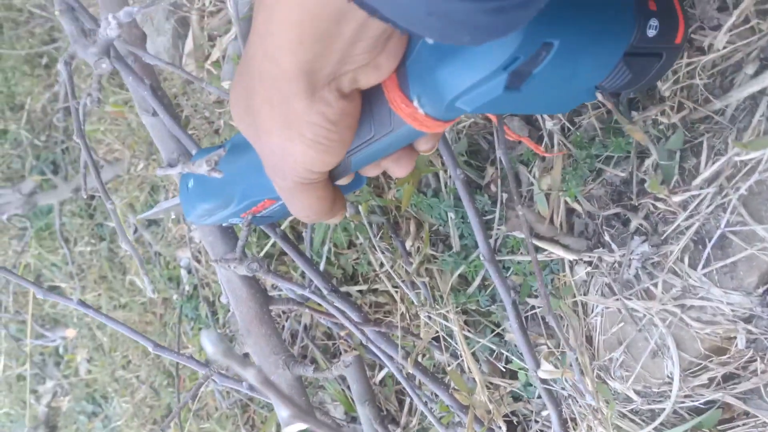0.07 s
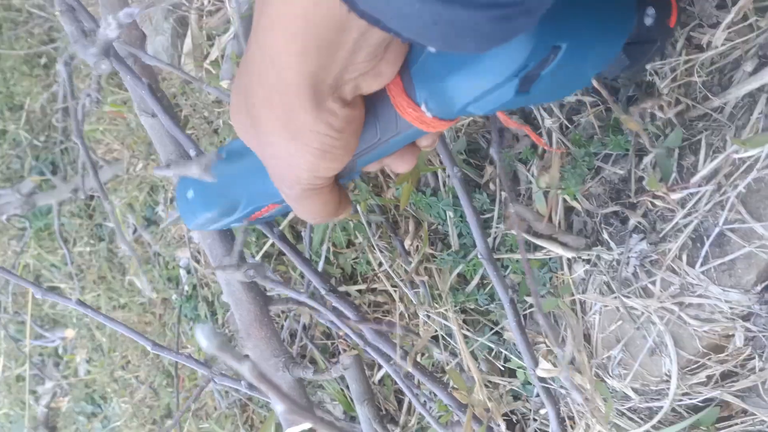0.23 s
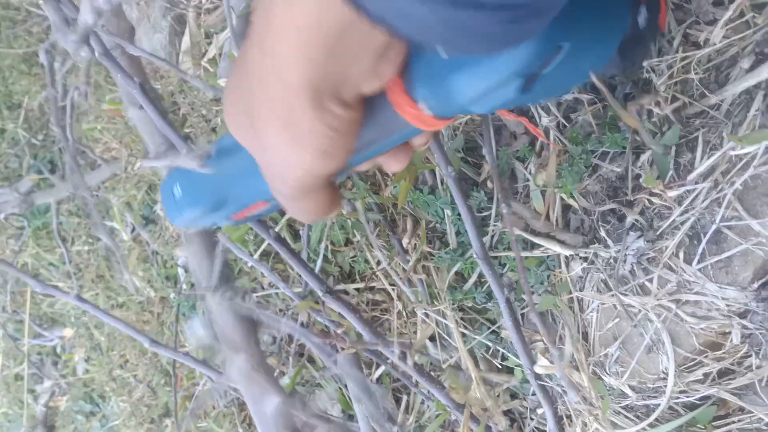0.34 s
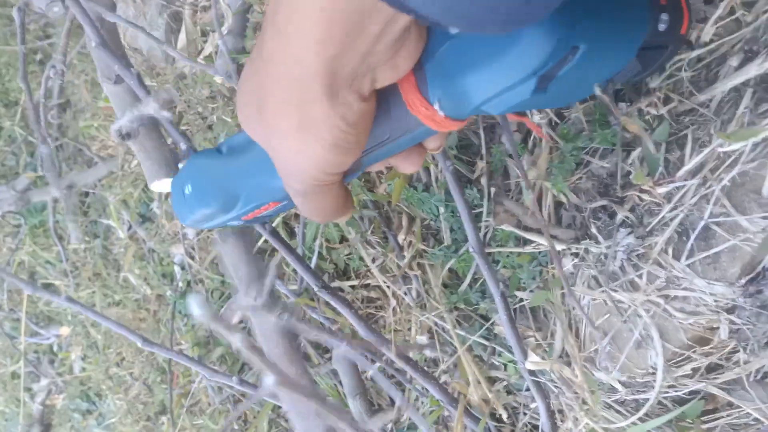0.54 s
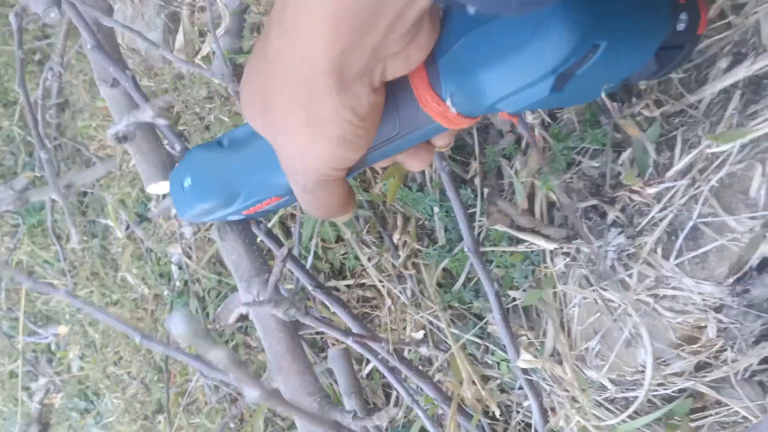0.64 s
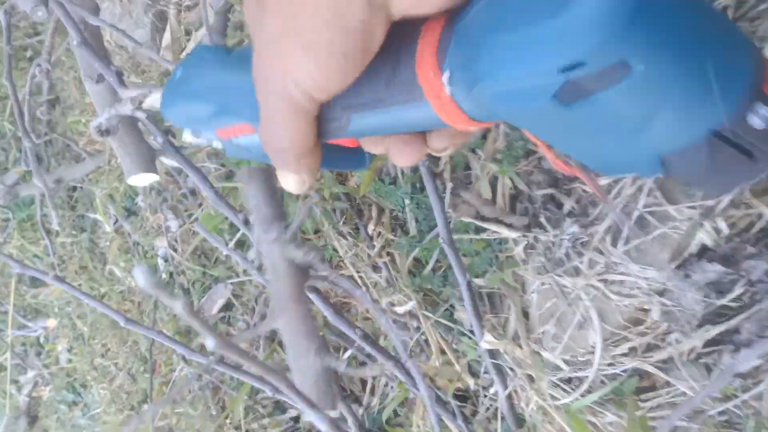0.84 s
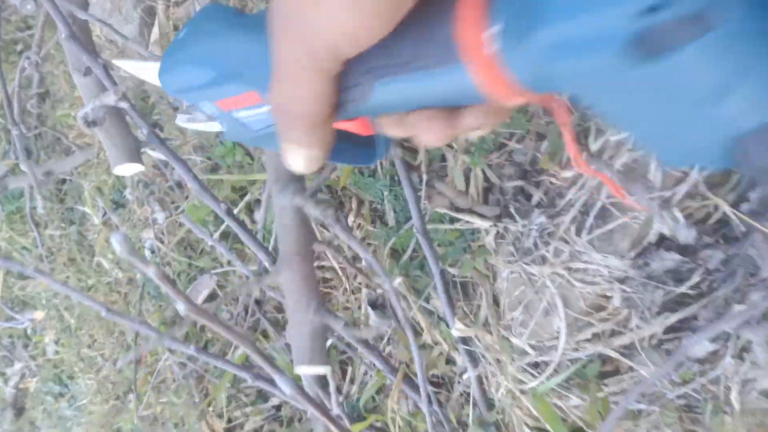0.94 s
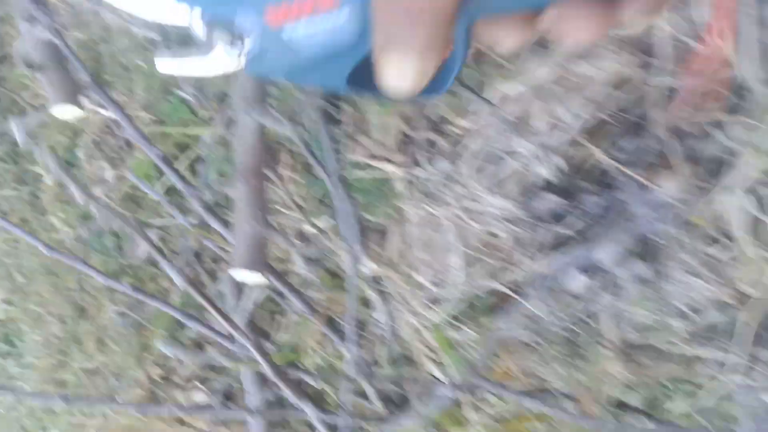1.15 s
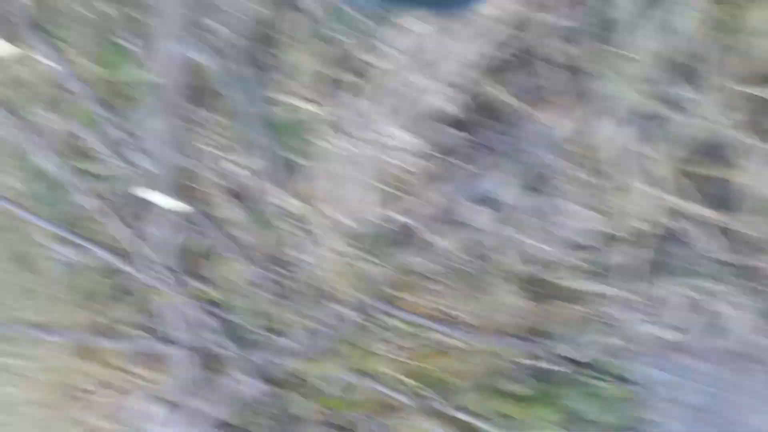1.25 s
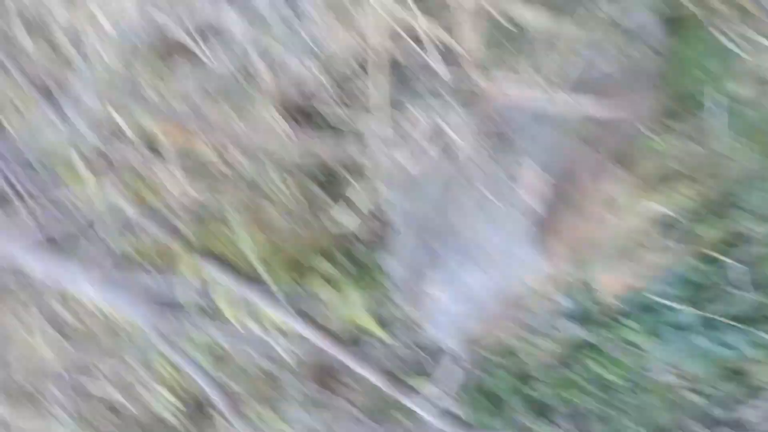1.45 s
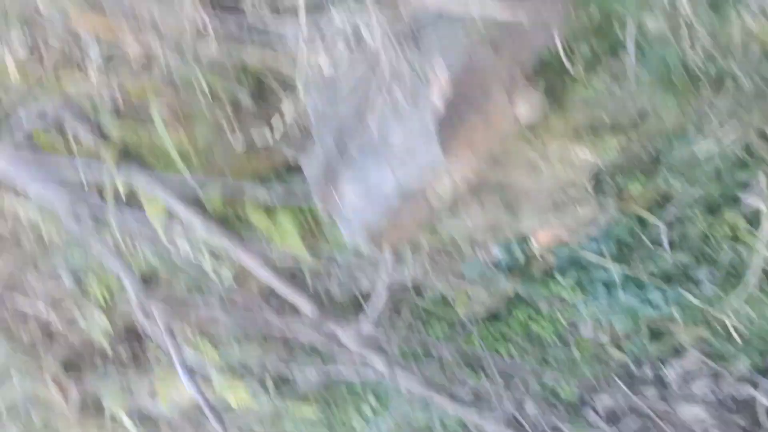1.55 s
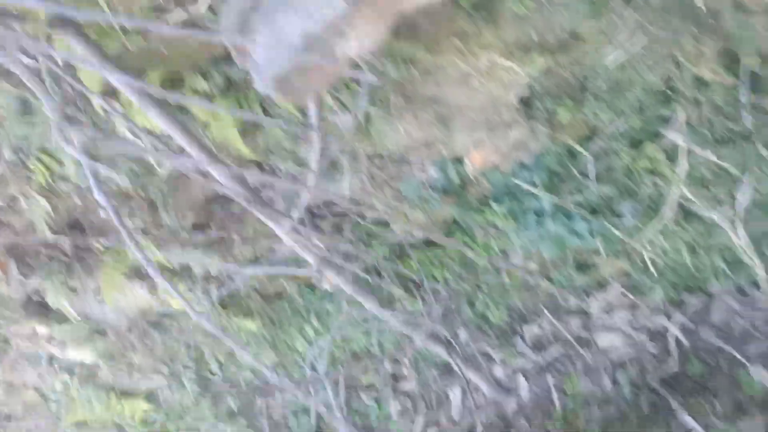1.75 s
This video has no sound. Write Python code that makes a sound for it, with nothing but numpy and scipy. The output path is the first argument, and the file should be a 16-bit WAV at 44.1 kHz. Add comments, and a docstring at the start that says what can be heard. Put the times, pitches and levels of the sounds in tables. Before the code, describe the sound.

A cordless pruner whines, snaps through a branch, then whirs open, and twigs rustle.

```python
"""A geared motor whines up to speed close to the microphone: a cordless pruner, outdoors.
The whine sags as the blade bites, and the branch snaps. The stalled motor hums while it holds the
blade shut, then whirs again to open it with a hollow knock. A sleeve and dry twigs rustle and scrape
as the tool is drawn away; light wind touches the microphone."""
import sys
import numpy as np
from scipy import signal
from scipy.fft import rfft, irfft
from scipy.io import wavfile
from scipy.ndimage import uniform_filter1d

SR = 44100
rng = np.random.default_rng(int(sys.argv[2]) if len(sys.argv) > 2 else 0)


def wrap_up_sound(samples):
    """Save the sound to the file named by the first command line argument, as 16-bit audio."""
    columns = np.atleast_2d(samples).T
    # keep every value between -1 and 1, then stretch to whole-number steps
    tamed = np.clip(columns, -1, 1)
    steps = np.round(tamed * 32767).astype(np.int16)
    wavfile.write(sys.argv[1], SR, steps)


N = 79380
T = np.arange(N) / SR
HZ = np.fft.rfftfreq(N, 1 / SR)

# The two strokes. Each row: time in seconds, gear mesh rate in Hz, whine level in dB.
CLOSE_STROKE = [(0.185, 2020, -86), (0.205, 2629, -71), (0.214, 2890, -58), (0.226, 3120, -35),
                (0.25, 2947, -41), (0.28, 2660, -39.5), (0.3, 2500, -47), (0.33, 2400, -48),
                (0.365, 2290, -44.5), (0.4, 2430, -44.5), (0.417, 2469, -45.5), (0.432, 2756, -62),
                (0.452, 2550, -64), (0.461, 1730, -58), (0.48, 890, -107)]
OPEN_STROKE = [(0.618, 555.5, -73), (0.635, 1443, -58), (0.655, 2700, -57.5), (0.668, 2971, -57),
               (0.685, 3150, -57), (0.71, 3260, -59), (0.79, 3262, -53.5), (0.803, 3070, -56),
               (0.81, 2768, -56), (0.822, 2437, -50), (0.83, 2124, -58), (0.839, 1866, -43.5),
               (0.85, 1683, -65), (0.89, 890, -66.5)]
# Gear partials, loaded and running free. Each row: multiple of the mesh rate, gain in dB.
CLOSE_PARTIALS = [(0.63, -19), (0.917, -10), (1, 0.5), (1.042, -1.5), (1.25, -19)]
OPEN_PARTIALS = [(1, -0.5), (1.665, -17), (2, -22)]
# Partials that swell as the load shifts.
# Each row: multiple of the mesh rate, peak time and half length in seconds, level in dB.
SQUEALS = [(1.625, 0.3, 0.031, -46.5), (2.27, 0.294, 0.019, -63), (1.875, 0.35, 0.019, -57),
           (1.875, 0.423, 0.019, -56)]
# Gear rattle. Each row: time in seconds, level in dB.
CLOSE_RATTLE = [(0.16, -82), (0.175, -70.5), (0.195, -55), (0.213, -54.5), (0.23, -45), (0.255, -44),
                (0.3, -41), (0.36, -42.5), (0.415, -40), (0.43, -52), (0.455, -50), (0.475, -74),
                (0.485, -54.5), (0.53, -80)]
OPEN_RATTLE = [(0.61, -70), (0.638, -52.5), (0.657, -51), (0.675, -59), (0.75, -57.5), (0.8, -57.5),
               (0.85, -63.5), (0.89, -61.5)]
# Spectra of that rattle. Each row: frequency in Hz, relative level in dB.
CLOSE_SPECTRUM = [(100, -22), (300, -19), (600, -9), (1100, -5.5), (1800, 0.5), (2700, 3), (3400, 0),
                  (4300, -7.5), (5300, -13), (7000, -18.5), (10000, -25.5), (15000, -26)]
OPEN_SPECTRUM = [(100, -13), (500, -2), (1100, -1.5), (1800, 0.5), (2700, -5.5), (4200, -7.5), (5500, -14),
                 (8000, -25.5), (15000, -53)]
# Gear case resonance. Each row: time in seconds, frequency in Hz, level in dB.
CASE_BUZZ = [(0.65, 1526, -66), (0.7, 1668, -57), (0.75, 1782, -52.5), (0.8, 1912, -54), (0.83, 1914, -53),
             (0.855, 1953, -68)]
# Hum of the stalled motor. Each row: time in seconds, level in dB.
HOLD_HUM = [(0.465, -65), (0.495, -63.5), (0.517, -54), (0.538, -64.5), (0.555, -54.5), (0.574, -64),
            (0.605, -71), (0.622, -57.5), (0.635, -99)]
# Breaks within the snap. Each row: start in seconds, gain in dB, treble gain in dB.
FRACTURES = [(0.4179, -4, 14), (0.4184, -4, 8), (0.4198, 4, -9), (0.4227, -2.5, -47)]
# Ring of branch and blade.
# Each row: frequency in Hz, level in dB, t60 in seconds, left minus right in dB.
SNAP_MODES = [(260, -40.5, 0.03, -2), (343, -32, 0.034, 2), (580, -36, 0.019, 2), (990, -33, 0.0067, -28),
              (1890, -31, 0.016, -8.5), (2605, -24, .011, -1), (3010, -22.5, 0.009, 1.5),
              (4140, -25, 0.0078, 12), (5330, -42.5, 0.014, 12), (5900, -49, 0.0061, -6),
              (7700, -44, 0.0049, 14), (9070, -46, 0.0085, 4.5), (13000, -43, 0.0052, 9)]
# Ring of the housing. Each row: frequency in Hz, level in dB, t60 in seconds.
HOUSING_MODES = [(313, -48.5, .025), (465, -30.5, 0.016), (565, -52, 0.013), (900, -39.5, 0.019)]
# Trigger, linkage and twigs. Each row: start in seconds, peak in dB, centre in Hz,
# half width in octaves, t60 in seconds, left minus right in dB.
CLICKS = [(0.103, -54.5, 4160, 0.23, 0.031, 18), (0.1016, -53, 9000, 1, 0.019, 10.5),
          (0.234, -38.5, 1900, 0.18, 0.023, -19), (0.444, -44, 3280, 0.48, .012, 14),
          (0.587, -53.5, 3800, .12, 0.031, 19), (0.601, -47.5, 3460, 0.55, 0.007, 19),
          (0.619, -51.5, 570, .2, 0.03, 3), (0.6419, -39.5, 2000, 0.47, 0.0049, 2),
          (0.653, -51, 4500, 0.17, 0.044, 21), (0.789, -45, 3700, 0.18, 0.014, 4),
          (0.858, -44, 2500, 0.39, .012, 11), (0.909, -41, 2200, 0.45, 0.0031, 14),
          (1.02, -43, 1770, 0.28, 0.039, -7), (1.105, -44.5, 910, 0.4, .008, -2),
          (1.18, -57, 1500, 0.91, .006, -2), (1.203, -44, 1490, 0.23, 0.02, -9),
          (1.237, -39, 900, 0.6, 0.011, -2), (1.3322, -34.5, 1400, 0.47, 0.0072, -1),
          (1.3438, -39, 3420, 0.34, 0.025, 7), (1.3557, -56, 1600, 1.1, 0.0084, 7),
          (1.425, -47, 4520, 0.38, .008, 18)]
# Sleeve and twigs. Each row: time in seconds, body level in dB, treble level in dB.
RUSTLE = [(0.44, -54.5, -56.5), (0.5, -69.5, -60), (0.54, -62, -64.5), (0.61, -68.5, -64.5),
          (0.83, -64.5, -63), (0.88, -58, -60.5), (0.915, -58.5, -56.5), (0.99, -59, -62),
          (1.07, -59, -62.5), (1.13, -57, -60), (1.21, -54.5, -58), (1.28, -59, -59), (1.34, -55, -55.5),
          (1.375, -63, -61.5), (1.45, -64.5, -61.5), (1.52, -61, -62), (1.6, -61, -66), (1.67, -70, -73),
          (1.8, -69, -72)]
# Twigs sliding along the tool. Each row: time in seconds, pitch in Hz, level in dB.
RISING_SCRAPE = [(1.07, 850, -76), (1.14, 1050, -59.5), (1.21, 1400, -56.5), (1.26, 1700, -58),
                 (1.32, 1900, -79)]
FALLING_SCRAPE = [(1.45, 3200, -76), (1.495, 2800, -61), (1.512, 2200, -65), (1.522, 1950, -57.5),
                  (1.54, 1850, -67), (1.6, 1700, -88), (1.64, 1600, -73)]
# Spectra of rustle, wind and air. Each row: frequency in Hz, relative level in dB.
RUSTLE_BODY = [(60, -13), (140, -7), (400, -5.5), (800, -2.5), (1250, -1), (2000, 0.5), (2700, -8.5),
               (4000, -20), (8000, -37)]
RUSTLE_TREBLE = [(500, -39), (1800, -14.5), (2800, 1.5), (4200, -1), (5500, -12), (8000, -19.5),
                 (12000, -16), (15500, -18)]
WIND_SPECTRUM = [(10, -1), (25, -5), (45, -4), (65, -14), (100, -20), (200, -29.5), (600, -45)]
AIR_SPECTRUM = [(71, -39), (120, -13), (159, -18.5), (191, 3.5), (1990, -13.5), (4200, -11),
                (4550, -36), (6040, -30.5), (15000, -28)]
# Wind on the microphone. Each row: time in seconds, level in dB.
WIND_LEVEL = [(0, -59.5), (1.4, -59.5), (1.6, -61), (1.85, -60.5)]
# Where tool and rustle sit in the stereo image. Each row: frequency in Hz, left minus right in dB.
TOOL_PAN = [(300, 1), (1300, 1), (2400, -6.5), (2900, 0), (3300, 4), (4400, 18), (8000, 8), (15000, 1.5)]
RUSTLE_PAN = [(100, -3.5), (700, -3), (1300, -5), (2400, -6), (4400, 8.5), (8000, 1), (15000, -3)]
# Likeness of the noise in the two channels. Each row: frequency in Hz, coherence from 0 to 1.
COHERENCE = [(50, 0.28), (250, 0.72), (650, 0.61), (1400, 0.03), (3000, 0), (15000, 0)]

SHAFT_PER_MESH = 1 / 24
LEFT_LAG_S = 0.0001  # the whine reaches the right microphone first


def closing_gears():
    """Close up, loaded gears whine and rattle while the blade is pushed through the wood."""
    hz = pitch(CLOSE_STROKE) * (1 + 0.0028 * wander(59))
    whine = sum(amp(db) * gear_tone(k * hz, rough=0.62, rough_hz=58) for k, db in CLOSE_PARTIALS)
    squeal = sum(amp(db) * np.exp(-((T - s) / half) ** 2) * gear_tone(k * hz, rough=0.21, rough_hz=50.3)
                 for k, s, half, db in SQUEALS)
    shaft_phase = phase(hz * SHAFT_PER_MESH)
    throb = 1 + 0.11 * np.sin(shaft_phase)
    contacts = grains(per_s=3100, spread_db=3.5, hiss=1.0) * throb
    rattle = colour(contacts + 0.75 * shaft_overtones(shaft_phase), CLOSE_SPECTRUM, curve(TOOL_PAN))
    return level(CLOSE_STROKE) * whine + squeal + level(CLOSE_RATTLE) * rattle


def opening_gears():
    """Free-running gears: a clean whine that levels off and brakes, and a buzzing case."""
    hz = pitch(OPEN_STROKE)
    whine = sum(amp(db) * gear_tone(k * hz, rough=0.2, rough_hz=59) for k, db in OPEN_PARTIALS)
    rattle = colour(grains(per_s=1500, spread_db=1.5, hiss=0.94), OPEN_SPECTRUM, curve(TOOL_PAN))
    case = rough_tone(pitch(CASE_BUZZ), rough=4.4, rough_hz=140)
    return level(OPEN_STROKE) * whine + level(OPEN_RATTLE) * rattle + level(CASE_BUZZ) * case


def gear_tone(hz, rough, rough_hz):
    """One partial of the meshing teeth, leaning left or right with its frequency."""
    return pan(np.interp(hz, HZ, curve(TOOL_PAN))) * rough_tone(hz, rough, rough_hz)


def shaft_overtones(shaft_phase, count=48):
    """Overtones of the turning shaft, each swelling and fading by chance."""
    knots = np.linspace(0, T[-1], 70)
    out = np.zeros((2, N))
    for k in range(1, count + 1):
        overtone = amp(3.5 * rng.standard_normal()) * np.exp(1j * k * shaft_phase)
        swells = noise(len(knots)) + 1j * noise(len(knots))
        out += np.array([(np.interp(T, knots, side) * overtone).real for side in swells])
    return unit(out)


def branch_snap(rise_cycles=0.31, crack_db=-38, crack_t60_s=0.011, tail_db=-15.5, tail_t60_s=0.053):
    """The last fibres break in quick steps, ringing branch and blade; the ground scatters a short tail."""
    out = np.zeros((2, N))
    for start, db, treble_db in FRACTURES:
        t = np.maximum(T - start, 0)
        for hz, mode_db, t60, side_db in SNAP_MODES:
            attack = 1 - np.exp(-t * hz / rise_cycles)
            decay = amp(db + mode_db + treble_db * hz / (hz + 8000) - 60 * t / t60)
            detuned_hz = hz * (1 + 0.012 * rng.standard_normal())
            out += pan(side_db) * attack * decay * np.sin(2 * np.pi * detuned_hz * t)
        crack = (T > start) * amp(db + treble_db + crack_db - 60 * t / crack_t60_s) * noise()
        out += pan(7.3) * crack
    scatter = noise(SR // 4) * amp(-60 * T[:SR // 4] / tail_t60_s)
    tail = signal.fftconvolve(out, scatter / np.linalg.norm(scatter[0]), axes=1)[:, :N]
    low_cut = signal.butter(3, 187, "highpass", fs=SR, output="sos")
    return signal.sosfilt(low_cut, out + amp(tail_db) * tail)


def stalled_motor(hz=469, octave_db=-10):
    """The motor hums, slightly unsteady, as it holds the blade shut."""
    angle = phase(hz * (1 + 0.0079 * wander(29)))
    return level(HOLD_HUM) * unit(np.sin(angle) + amp(octave_db) * np.sin(2 * angle))


def housing_knock(start_s=0.6555, rise_s=0.0011):
    """The hollow housing rings as the blade comes free."""
    t = np.maximum(T - start_s, 0)
    ring = sum(amp(db - 60 * t / t60) * np.sin(2 * np.pi * hz * t) for hz, db, t60 in HOUSING_MODES)
    return np.minimum(t / rise_s, 1) * ring


def clicks(edge_db=21):
    """Trigger, linkage and twigs click: a sharp contact, then a dry burst, each in its own band."""
    out = np.zeros((2, N))
    for start, db, hz, octaves, t60, side_db in CLICKS:
        decay = (T > start) * amp(-60 * np.maximum(T - start, 0) / t60)
        burst = decay * (rng.standard_normal(N) + 0.35 * noise())
        burst[:, round(start * SR)] += amp(edge_db)
        band = 1 / (1 + (np.log2((HZ + 1) / hz) / octaves) ** 2)
        click = irfft(rfft(burst) * band, N)
        out += amp(db) * pan(side_db) * click / abs(click).max()
    return out


def sleeve_and_twigs():
    """Cloth and dry twigs brush past the microphone in fine grains."""
    body = colour(grains(per_s=1500, spread_db=3, hiss=1.16), RUSTLE_BODY, curve(RUSTLE_PAN))
    treble = colour(grains(per_s=1800, spread_db=1.5, hiss=1.22), RUSTLE_TREBLE, curve(RUSTLE_PAN))
    flicker = amp(1.06 * wander(25))
    return flicker * (level(RUSTLE, column=1) * body + level(RUSTLE, column=2) * treble)


def twig_scrapes():
    """Twigs slide hoarsely along the tool, a little to the right: one scrape rises, one falls."""
    rising = level(RISING_SCRAPE) * rough_tone(pitch(RISING_SCRAPE), rough=5, rough_hz=330)
    falling = level(FALLING_SCRAPE) * rough_tone(pitch(FALLING_SCRAPE), rough=4, rough_hz=190)
    return pan(-3) * (rising + falling)


def air_and_wind(air_db=-76, buffet_db=-50, buffet_s=1.381, buffet_hz=43.3, half_length_s=0.014):
    """Quiet open air, low wind and one soft buffet on the microphone."""
    air = amp(air_db) * colour(noise(), AIR_SPECTRUM)
    wind = level(WIND_LEVEL) * colour(noise(), WIND_SPECTRUM, side_db=-0.5)
    t = T - buffet_s
    buffet = np.exp(-(t / half_length_s) ** 2) * np.cos(2 * np.pi * buffet_hz * t)
    return air + wind + amp(buffet_db) * buffet


def rough_tone(hz, rough, rough_hz):
    """A tone whose strength and phase flutter with uneven contact."""
    right_lead = np.array([[0], [LEFT_LAG_S]]) * hz
    tone = np.exp(1j * (phase(hz) + 2 * np.pi * (rng.random() + right_lead)))
    flutter = np.array([wander(rough_hz) + 1j * wander(rough_hz) for _ in range(2)])
    return unit((tone * (1 + rough * flutter)).real)


def grains(per_s, spread_db, hiss):
    """Tiny contacts of uneven size over a smooth hiss."""
    size = amp(spread_db * np.minimum(rng.exponential(1, N), 4))
    hits = rng.random(N) < per_s / SR
    return unit(size * hits * noise()) + hiss * noise()


def colour(pair, spectrum, side_db=0):
    """Gives two unrelated signals a spectrum, a likeness and a position, at rms 1."""
    left, other = rfft(pair)
    coherence = np.clip(curve(COHERENCE), -1, 1)
    right = coherence * left + np.sqrt(1 - coherence ** 2) * other
    return unit(irfft(np.array([left, right]) * amp(curve(spectrum)) * pan(side_db), N))


def noise(samples=N):
    """Two unrelated channels of white noise."""
    return rng.standard_normal((2, samples))


def wander(rate_hz):
    """Smooth random drift of rms 1."""
    return unit(irfft(rfft(rng.standard_normal(N)) * np.exp(-0.5 * (HZ / rate_hz) ** 2), N))


def curve(points):
    """A table's value at every frequency, joined on a log axis."""
    hz, value = np.transpose(points)
    return np.interp(np.log(HZ + 1), np.log(hz + 1), value)


def level(points, column=-1):
    """Gain over time from a dB column; silent outside the table."""
    rows = np.array(points)
    return amp(np.interp(T, rows[:, 0], rows[:, column], left=-140, right=-140))


def pitch(points):
    """Smoothed frequency over time from the second column."""
    rows = np.array(points)
    return uniform_filter1d(np.interp(T, rows[:, 0], rows[:, 1]), size=250)


def phase(hz):
    """Running angle in radians."""
    return 2 * np.pi * np.cumsum(hz) / SR


def pan(side_db):
    """Channel gains from left minus right in dB."""
    return amp(np.array([[0.5], [-0.5]]) * side_db)


def amp(db):
    """Decibels to gain."""
    return 10 ** (np.asarray(db) / 20)


def unit(x):
    """Scales to rms 1."""
    return x / np.sqrt(np.mean(abs(x) ** 2) + 1e-20)


def scene():
    """One cut at close range, from trigger to withdrawal."""
    cut = closing_gears() + branch_snap() + stalled_motor() + housing_knock() + opening_gears()
    return cut + clicks() + sleeve_and_twigs() + twig_scrapes() + air_and_wind()


def record(dry):
    """The recorder's band ends at 15.8 kHz."""
    low_pass = signal.firwin(511, 15800, window=("kaiser", 9), fs=SR)
    return signal.oaconvolve(dry, low_pass[None], "same")


dry = scene()
out = record(dry)
wrap_up_sound(out)
```